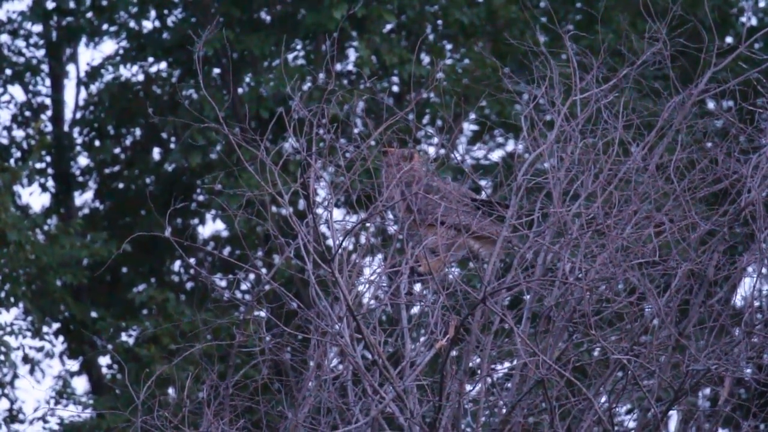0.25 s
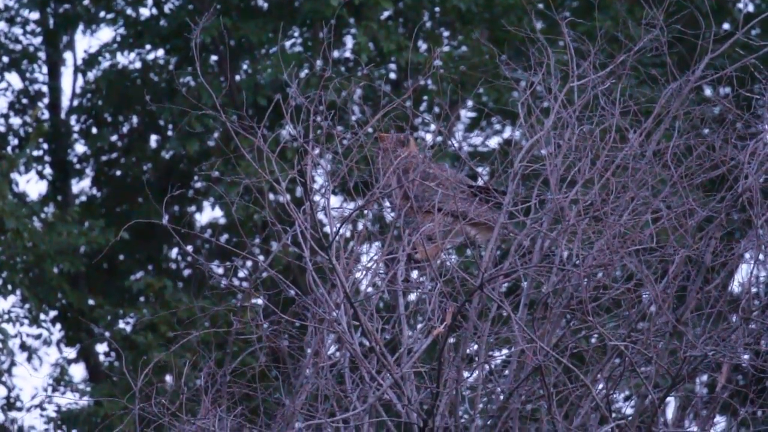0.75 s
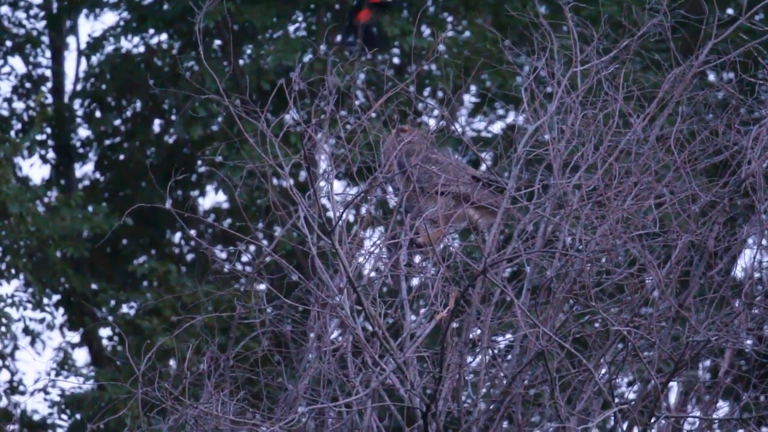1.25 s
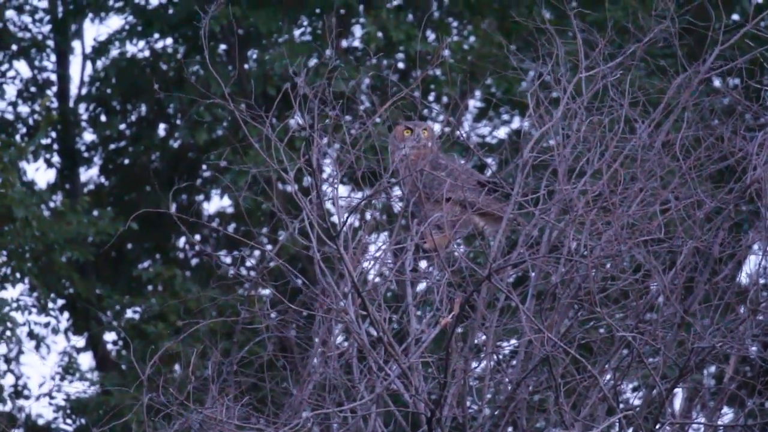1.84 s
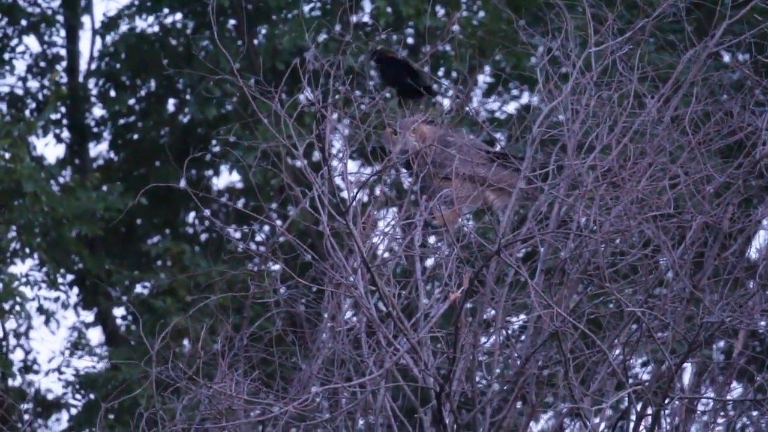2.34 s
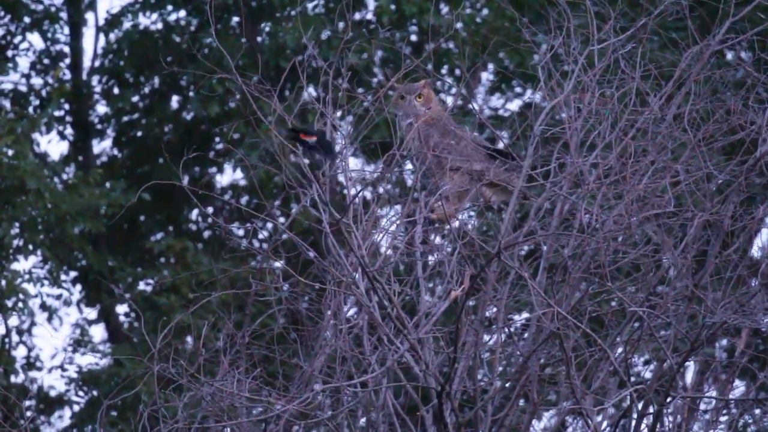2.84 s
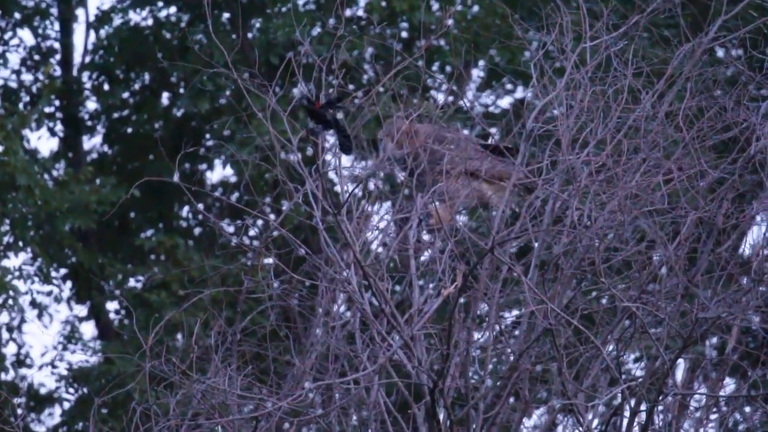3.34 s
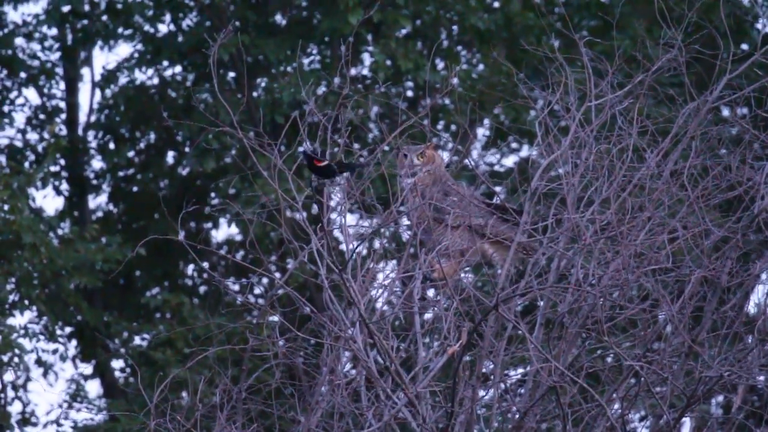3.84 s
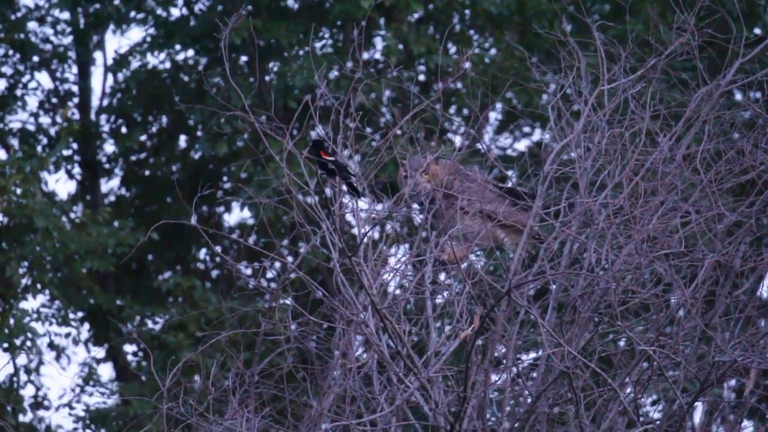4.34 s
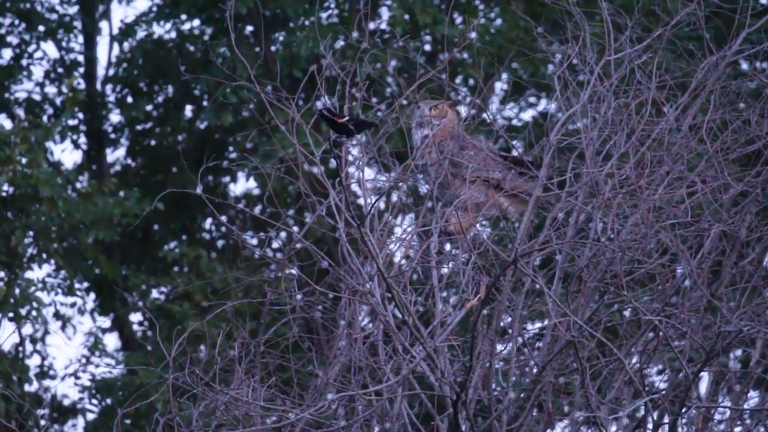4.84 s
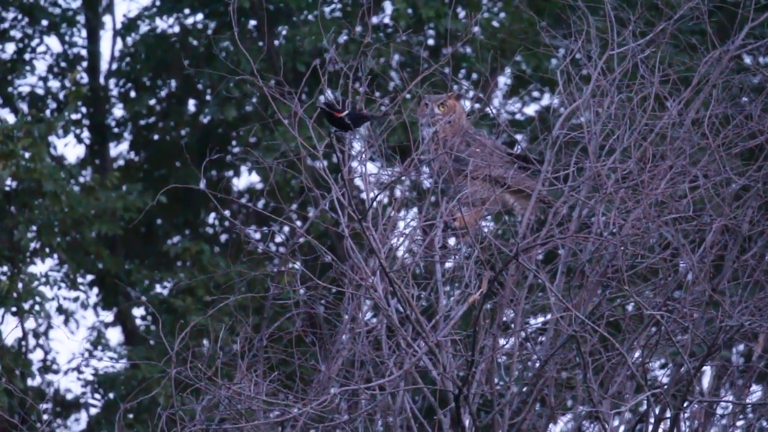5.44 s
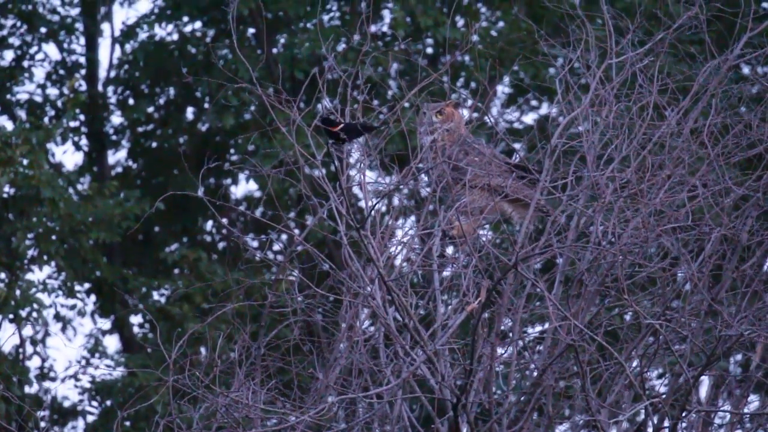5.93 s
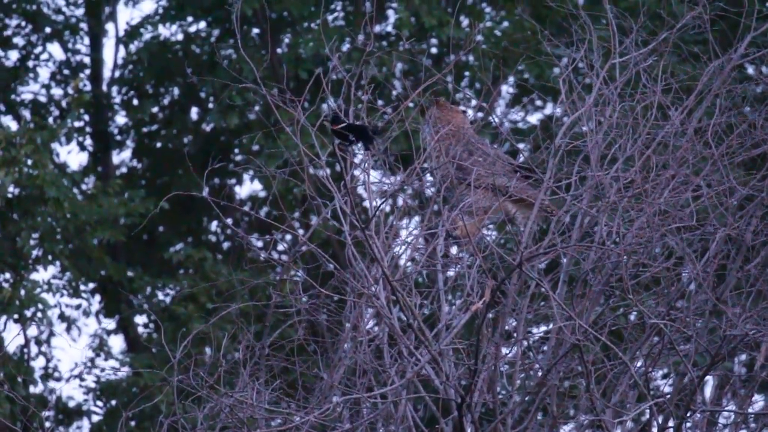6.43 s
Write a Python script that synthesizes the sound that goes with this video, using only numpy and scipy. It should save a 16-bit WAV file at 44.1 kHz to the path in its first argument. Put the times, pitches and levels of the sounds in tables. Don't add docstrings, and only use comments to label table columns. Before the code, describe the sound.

Two birds give sharp, steady yelping alarm calls in a leafy park, with scolding chucks, falling buzzy whistles and a thin cricket trill.

```python
import sys
import numpy as np
from scipy import signal
from scipy.io import wavfile
from scipy.ndimage import uniform_filter1d

SR = 44100
rng = np.random.default_rng(int(sys.argv[2]) if len(sys.argv) > 2 else 0)


def to_wav(s):
    ch = np.atleast_2d(s).T
    pcm = np.round(np.clip(ch, -1, 1) * 32767)
    wavfile.write(sys.argv[1], SR, pcm.astype(np.int16))


def linear_from_db(decibels):
    return 10 ** (np.asarray(decibels, float) / 20)


N = 294588


def evened(x):
    return x / np.sqrt(np.mean(x ** 2) + 1e-20)


def read(points, hz):
    f, value = np.transpose(points)
    return np.interp(np.log(hz + 1), np.log(f + 1), value)


def add(mix, s, sound, pan_db):
    part = mix[:, round(s * SR):][:, :len(sound)]
    part += sound[:part.shape[1]] * linear_from_db(np.array([[pan_db / 2], [-pan_db / 2]]))


def drift(count, span):
    smooth = uniform_filter1d(rng.standard_normal(count), span)
    return evened(uniform_filter1d(smooth, span))


def angle(hz):
    return 2 * np.pi * (np.cumsum(hz) / SR + rng.random())


def resonate(x, hz, width):
    turn = np.exp(2j * np.pi * hz * np.arange(len(x)) / SR)
    r = np.exp(-np.pi * width / SR)
    smooth = signal.lfilter([(1 - r) ** 2], [1, -2 * r, r * r], x / turn)
    return 2 * (turn * smooth).real


def without_bass(x, order, hz):
    return signal.sosfilt(signal.butter(order, hz, "high", fs=SR, output="sos"), x)


# f/Hz, likeness/-1 to 1
LIKENESS = [(60, 0.99), (150, 0.87), (380, 0.86), (950, 0.78), (2380, 0.35), (5980, -0.56), (15000, 0.11)]
# f/Hz, level/dB per Hz
HUM_COLOUR = [(30, -45), (50, -62.5), (80, -16.5), (115, -6.5), (165, -11), (420, -0.5), (850, 1),
              (1300, -3.5), (2060, -9), (3400, -10), (5000, -6), (5500, -15.5), (9000, -24), (15500, -33)]
# t/s, level/dB
TRAFFIC_SWELL = [(0.0, -49), (1.41, -48), (2.55, -49.5), (3.12, -48.5), (4.93, -48), (5.41, -49.5),
                 (6.34, -48.5), (6.68, -49)]


def hum():
    frames, hz = N // 512 + 5, np.fft.rfftfreq(2048, 1 / SR)
    a, b, c, d, patches = rng.standard_normal((frames, 1025, 5)).T
    patches = evened(uniform_filter1d(uniform_filter1d(patches, 20, 0), 7, 1))
    same = np.clip(read(LIKENESS, hz), -1, 1)[:, None]
    left = a + 1j * b
    right = same * left + np.sqrt(1 - same ** 2) * (c + 1j * d)
    z = np.array([left, right])
    at, swell_db = np.transpose(TRAFFIC_SWELL)
    swell_db = np.interp(np.arange(frames) * 512 / SR, at, swell_db - swell_db.mean())
    low_share = 1 / (1 + (hz[:, None] / 2500) ** 2)
    z *= linear_from_db(read(HUM_COLOUR, hz)[:, None] + 0.97 * patches + swell_db * low_share)
    lean_db = np.cos(np.pi * np.minimum(hz / 6000, 1))[:, None]
    z *= linear_from_db(np.array([.5, -.5])[:, None, None] * lean_db)
    noise = signal.istft(z, nperseg=2048, noverlap=1536)[1][:, :N]
    return linear_from_db(-46) * evened(noise)


def scatter(x, decay, shared):
    taps = np.zeros((2, SR))
    at = np.arange(60, SR - 20, 20) + rng.integers(0, 20, (2, (SR - 61) // 20))
    np.put_along_axis(taps, at, rng.choice([-1., 1.], at.shape), 1)
    taps[1] += shared * taps[0]
    hz, t, z = signal.stft(taps, SR, nperseg=256)
    fade = linear_from_db(-60 * t / read(decay, hz)[:, None])
    tail = signal.istft(z * fade, SR, nperseg=256)[1]
    tail = tail / np.linalg.norm(tail, axis=1)[:, None]
    return signal.fftconvolve(x, tail, axes=1)[:, :N]


# f/Hz, fade/s
TWIG_FADE = [(800, 0.022), (3000, 0.14), (7000, 0.22), (12000, 0.029)]
# f/Hz, fade/s
TREE_FADE = [(500, 0.82), (2500, 0.6), (4000, 0.56), (7000, 0.686), (12000, 0.69)]
# f/Hz, fade/s
TRUNK_FADE = [(1500, 0.038), (4000, 0.042), (9000, 0.068)]


def echoes(near, far, frog, insect):
    twigs = scatter(linear_from_db(-7) * near + linear_from_db(-5.5) * far + linear_from_db(-5) * frog, TWIG_FADE, 0.65)
    sent = linear_from_db(-5) * near + linear_from_db(-4.0) * far + linear_from_db(-14) * frog + linear_from_db(-9) * insect
    trees = scatter(sent, TREE_FADE, 0.75)
    delay_s = 0.03
    late = np.roll(scatter(near, TRUNK_FADE, 0.6), round(delay_s * SR), axis=1)
    trunks = linear_from_db(-14) * late * (np.arange(N) > delay_s * SR)
    return twigs + trees + trunks


def cricket():
    strokes_per_s, first_stroke = 33.876, .66
    u = (first_stroke + strokes_per_s * np.arange(N) / SR + .03 * drift(N, 2000)) % 1
    gate = np.clip((.29 - abs(u - .47)) / .05, 0, 1)
    hz = 4990 - 270 * np.clip((u - .3) / .45, 0, 1) ** 1.6 + 22 * drift(N, 700)
    level_db = -51 + 1.55 * drift(N, 1500) + 0.53 * drift(N, 200) + 1.38 * np.sin(np.pi * u)
    insect = np.zeros((2, N))
    add(insect, 0, linear_from_db(level_db) * gate * np.sin(angle(hz)), pan_db=2.2)
    return insect


def plop(s, hz, db, t60):
    t = np.arange(0, t60, 1 / SR)
    ring = linear_from_db(-60 * t / t60) * np.sin(2 * np.pi * hz * t)
    snap = linear_from_db(-9.5 - 60 * t / 0.007) * np.sin(2 * np.pi * 2.28 * hz * t)
    return s, linear_from_db(db) * (1 - np.exp(-(t / 0.001) ** 2)) * (ring + snap)


def frog_call(row, sac):
    s, mouth_hz, low_db, mouth_db, high_db = row
    (low_hz, low_t60), (high_hz, high_t60) = sac
    mouth_t60 = max(0.022 * (887 / mouth_hz) ** 2.5, .015)
    return [plop(s, low_hz, low_db, low_t60), plop(s, mouth_hz, mouth_db, mouth_t60),
            plop(s, high_hz, high_db, high_t60)]


# t/s, mouth ring f/Hz, low ring level/dB, mouth level/dB, high ring level/dB
FROG_PLOPS = [
    (0.3612, 1055, -28, -15.5, -29.5),
    (.867, 964, -28, -25, -36.5),
    (1.212, 872, -31, -11, -32.5),
    (3.0, 887, -20, -13.5, -27.5),
    (3.356, 1090, -27.5, -17.5, -25),
    (3.641, 1150, -19.5, -18, -19.5),
    (4.847, 879, -23.5, -20.5, -24.5),
    (5.10, 1052, -26.5, -20.5, -29.5),
]
SMALL_FROG_PLOPS = [
    (1.7655, 2310, -27, -33, -28),
    (1.9198, 1020, -12, -11, -15),
]
# f/Hz, fade by 60 dB/s
FROG_SAC = [(620, .021), (1780, .018)]
SMALL_FROG_SAC = [(742, .015), (1480, .013)]


def frogs():
    frog = np.zeros((2, N))
    calls = [frog_call(row, FROG_SAC) for row in FROG_PLOPS]
    calls += [frog_call(row, SMALL_FROG_SAC) for row in SMALL_FROG_PLOPS]
    for rings in calls:
        for ring in rings:
            add(frog, *ring, pan_db=3.0)
    return without_bass(frog, 2, 200)


def chip(s, length, first_hz, last_hz, db, pan_db, rough, bend=1.3):
    u = np.arange(0, 1, 1 / (length * SR))
    glide_hz = first_hz + (last_hz - first_hz) * np.sin(np.pi / 2.2 * u ** bend)
    a = angle(glide_hz * (1 + rough * drift(len(u), 30)))
    flicker_db = 46 * min(length, .12) * drift(len(u), 150)
    return s, np.sqrt(2) * linear_from_db(db + flicker_db) * np.sin(a) * signal.windows.tukey(len(u), .6), pan_db


# t/s, length/s, first f/Hz, last f/Hz, level/dB
RISING_CALLS = [(0.483, 0.017, 3030, 4280, -49.5), (.58, 0.015, 2820, 3050, -55),
                (0.595, 0.016, 2940, 5880, -43.5), (0.605, .011, 5740, 5700, -51),
                (0.701, 0.025, 3600, 6140, -46), (1.04, 0.074, 2813, 4310, -57),
                (1.15, 0.0198, 2370, 3150, -52), (1.143, .027, 3100, 4220, -52),
                (1.179, 0.0326, 4000, 4650, -51.5), (1.33, 0.0188, 2586, 3050, -61),
                (1.178, .03, 2940, 3740, -52), (1.347, 0.037, 2972, 4220, -43.5),
                (1.635, 0.016, 2810, 4920, -47), (1.936, 0.035, 4225, 4940, -50)]
QUICK_CALLS = [(0.291, 0.036, 3702, 4120, -47.5), (.345, 0.014, 4430, 6030, -55),
               (0.575, 0.029, 5570, 6500, -59), (0.816, 0.025, 4476, 5460, -48.5),
               (1.205, 0.02, 3380, 4720, -49), (1.544, 0.02, 3500, 6140, -51.5),
               (1.563, 0.013, 3680, 6250, -49), (1.621, .038, 5190, 7470, -52.5),
               (1.645, .015, 7350, 8100, -60), (.488, 0.01, 5800, 8030, -63),
               (1.025, 0.037, 6230, 5640, -65), (4.93, .018, 5470, 6660, -65),
               (4.1, .02, 5000, 7330, -53.5), (4.487, .02, 5400, 6450, -64),
               (2.066, 0.019, 2980, 4700, -45), (2.083, 0.019, 4660, 2650, -45)]
# t/s, level/dB, top f/Hz
THIN_CALLS = [
    (3.07, -53, 7800),
    (5.038, -53.5, 7380),
    (5.522, -55, 7350),
    (6.195, -56, 7870),
]
# t/s, length/s, f/Hz, level/dB
HELD_NOTES = [(0.322, 0.028, 3810, -48), (.365, 0.05, 4080, -56), (0.517, 0.02, 3800, -57.5),
              (0.525, 0.0086, 3790, -51), (.43, 0.055, 3870, -55.5), (3.789, .09, 3750, -64),
              (4.95, 0.085, 4010, -58), (0.651, 0.043, 2755, -50), (1.108, 0.046, 3833, -49.5),
              (1.47, 0.12, 3830, -60), (1.472, 0.032, 6686, -57), (1.599, 0.063, 3780, -59),
              (1.914, 0.048, 3886, -47.5), (3.30, .10, 3818, -58), (3.298, 0.054, 6570, -64),
              (3.459, 0.061, 3812, -56), (3.93, 0.036, 3830, -56), (4.512, .035, 3810, -53),
              (5.14, 0.16, 3995, -64), (5.326, 0.07, 3720, -62), (6.297, 0.056, 4010, -57.5),
              (6.13, 0.174, 4000, -66)]
# t/s, length/s, f/Hz, level/dB
LOW_SLURS = [(0.136, 0.02, 1975, -48), (3.451, 0.076, 788, -49.5), (4.235, 0.056, 2470, -52),
             (4.288, 0.0485, 2000, -54), (4.334, 0.221, 1057, -56), (5.32, .035, 1944, -55),
             (5.424, 0.029, 1700, -49), (5.643, .035, 2450, -51), (5.697, 0.046, 1815, -54.5),
             (5.757, 0.009, 2660, -56.5), (5.905, 0.067, 1895, -57.5)]


def small_birds(far):
    clear, reedy, hoarse = .008, .012, .06
    calls = [(*row, -3.5, reedy) for row in RISING_CALLS]
    calls += [(*row, .4, reedy) for row in QUICK_CALLS]
    calls += [(s, 0.013, 4670, hz, db, 6.5, clear, .6) for s, db, hz in THIN_CALLS]
    calls += [(s, length, hz, .99 * hz, db, -1.2, clear) for s, length, hz, db in HELD_NOTES]
    calls += [(s, length, hz, .91 * hz, db, -3, hoarse) for s, length, hz, db in LOW_SLURS]
    for call in calls:
        add(far, *chip(*call))


# t/s, ring f/Hz, level/dB, fade by 60 dB/s
BEAK_SNAPS = [
    (5.3032, 3200, -27, .014),
    (6.049, 3500, -29, .008),
    (4.685, 8000, -47, .005),
]


def beak_snaps(far):
    for row in BEAK_SNAPS:
        add(far, *plop(*row), pan_db=-1.5)


def chuck(s, length, db, throat_hz, pan_db, hz):
    u = np.arange(0, 1, 1 / (length * SR))
    arch = .75 + .3 * np.sin(np.pi * u ** 0.83)
    a = angle(hz * arch * (1 + 0.0447 * drift(len(u), 30)))
    pulses = evened(sum(np.cos(k * a) for k in range(2, 16)))
    drive = pulses + .5 * rng.standard_normal(len(u))
    drive = drive * linear_from_db(4 * drift(len(u), 45))
    voice = resonate(resonate(drive, throat_hz, 2900), throat_hz, 2900)
    voice = voice + linear_from_db(-18.5) * resonate(drive, 1.44 * throat_hz, 3400)
    voice = voice + linear_from_db(-33) * resonate(drive, 3.1 * throat_hz, 4100)
    return s, linear_from_db(db) * evened(voice) * 1.75 * np.sin(np.pi * u ** 0.8) ** 0.9, pan_db


# t/s, length/s, level/dB, throat f/Hz, left over right/dB
HARSH_CHUCKS = [(1.476, 0.039, -53.5, 2320, -0.9), (1.719, 0.038, -44, 3560, .3),
                (1.778, 0.04, -49, 4070, .3), (2.071, 0.042, -47.5, 3500, 0),
                (3.504, 0.036, -43.5, 3620, 0), (3.652, 0.043, -54, 3500, 2), (4.099, 0.068, -48, 3530, 1),
                (4.454, 0.0362, -47.5, 3600, .3), (4.855, 0.04, -44, 3860, .3),
                (5.123, 0.024, -50.5, 3600, 11), (5.43, 0.042, -44.5, 3780, .3),
                (4.858, .03, -68, 11600, .3), (6.05, .03, -67, 10300, .3), (5.44, 0.026, -59, 3400, .3),
                (.192, .045, -51, 3470, 0.3), (4.619, 0.034, -52, 3300, .3), (4.753, 0.026, -51, 3180, -4),
                (2.832, 0.029, -50, 3500, 2.7), (3.724, .03, -56, 2700, -4),
                (4.047, 0.031, -49.5, 2500, .3), (3.17, 0.022, -59, 2800, 2.13),
                (6.103, 0.028, -60, 3600, .3), (5.588, 0.021, -50, 3570, .3),
                (6.03, 0.032, -52, 3600, 22.5), (6.085, 0.032, -48.5, 3200, 4),
                (6.452, 0.023, -53, 2780, -8)]
DEEP_CHUCKS = [
    (0.546, 0.071, -54, 2180, -5),
    (5.628, 0.1, -58.5, 2180, -9),
]


def chucks(far):
    for row in HARSH_CHUCKS:
        add(far, *chuck(*row, hz=678))
    for row in DEEP_CHUCKS:
        add(far, *chuck(*row, hz=312))


# t/s, f/Hz, effort level/dB, buzz strength/0-1, tremolo/share
WHISTLE_SHAPE = [(0, 4753, -7, 0.9, -.1), (.035, 4010, -0.5, 0.7, -0.46), (.078, 3485, 0.5, 0.87, 0.061),
                 (.241, 3305, 0.6, 0.99, -0.083), (0.259, 3170, 0, 0.95, 0.22), (.283, 2830, -4, 1, -0.87),
                 (.305, 2570, -6, 1.0, -1.05), (.35, 2527, -2.5, 0.26, -0.43), (.435, 2580, -13, .04, 0.28)]


def whistle(s, db, buzz_depth, stretch):
    at, *columns = np.transpose(WHISTLE_SHAPE)
    at = at * stretch
    t = np.arange(0, at[-1], 1 / SR)
    hz, effort_db, strength, tremolo = (np.interp(t, at, c) for c in columns)
    buzz_hz = 328 - 110 * t - 4500 * np.maximum(t - .34, 0)
    rasp = buzz_depth ** 2
    buzz = angle(np.maximum(buzz_hz, 20) * (1 + .065 * rasp * drift(len(t), 40)))
    shake = buzz_depth * strength * (1 + .25 * drift(len(t), 300))
    a = angle(hz * (1 + .016 * rasp * strength * drift(len(t), 18)))
    bright = np.minimum(t / 0.053, 1) * np.minimum(strength, 1)
    tone = 0
    for k, part_db in enumerate([0, -28.5, -33.0, -41]):
        wobble = (1 + 0.62 * k) * shake * np.sin(buzz)
        tone = tone + linear_from_db(part_db) * bright ** k * np.sin((k + 1) * a + wobble)
    flutter = linear_from_db(db + effort_db + 0.4 * drift(len(t), 300)) * (1 + tremolo * np.cos(buzz))
    flutter = flutter * (1 + .36 * rasp * strength * drift(len(t), 22))
    return s, np.sqrt(2) * flutter * tone * signal.windows.tukey(len(t), .04)


# t/s, level/dB, buzz depth/rad, stretch/times
FALLING_WHISTLES = [
    (2.308, -35, 0.8, 1.0),
    (6.466, -39.5, 1.19, 1.15),
]


def whistles(near):
    for row in FALLING_WHISTLES:
        add(near, *whistle(*row), pan_db=0.2)


# t from its end/s, lower voice/share of held f, upper voice/share of held f
ALARM_DROP = [(.002, 1, .99), (.005, .76, .988), (.015, .61, .985), (.03, .36, .985)]


def robin(row, colour, sweep, sag, effort, gap_db, sum_db, octave_db, rasp):
    s, hold, low_hz, up_hz, db = row
    upper_db, sweep_db = colour
    at, *pitch = np.transpose(sweep + [(hold + r[0], *r[1:]) for r in ALARM_DROP])
    t = np.arange(at[0], at[-1], 1 / SR)
    curves = (*pitch, *np.transpose(effort))
    low, up, low_rel, up_rel = (uniform_filter1d(np.interp(t, at, c), size=90) for c in curves)
    held = np.clip(np.minimum(t, hold - t) / 0.012 + .5, 0, 1)
    early_db = sweep_db * np.clip(-t / .006, 0, 1)
    low_rel, up_rel = low_rel + early_db, up_rel + upper_db + early_db
    grit = 1 + .3 * (1 - held) * drift(len(t), 24)
    shake = 1 + (.002 + rasp * (1 - held)) * drift(len(t), 20)
    a = angle(low_hz * low * (1 - sag * np.clip(t / hold, 0, 1)) * shake)
    b = angle(up_hz * up * np.sqrt(shake))
    difference = held * linear_from_db(gap_db) * np.sin(b - a)
    total = (0.37 + 0.49 * held) * linear_from_db(sum_db + 2.7 * drift(len(t), 40)) * np.sin(a + b)
    overtone_level = linear_from_db(octave_db - 380 * np.maximum(t, 0) - low_rel)
    overtones = overtone_level * (np.sin(2 * a) + .5 * np.sin(3 * a))
    lower = linear_from_db(db + low_rel + 1.37 * drift(len(t), 60)) * (np.sin(a) + overtones)
    upper = linear_from_db(db + up_rel + 2.0 * drift(len(t), 60)) * (np.sin(b) + difference + total)
    return s + at[0], np.sqrt(2) * grit * (lower + upper) * signal.windows.tukey(len(t), .1)


# t/s, held length/s, lower voice f/Hz, upper voice f/Hz, level/dB
RIGHT_ALARMS = [(0.153, 0.03, 4290, 6800, -37.5), (0.714, 0.0404, 4287, 6650, -36.5),
                (1.226, 0.0372, 4236, 6700, -37.5), (1.811, 0.042, 4343, 6670, -34),
                (2.273, 0.033, 4313, 6910, -36.5), (2.785, 0.041, 4286, 6700, -35.5),
                (3.198, 0.037, 4260, 6740, -35.5), (3.617, 0.039, 4227, 6710, -37),
                (4.061, 0.035, 4287, 6820, -35.5), (4.575, 0.037, 4283, 6690, -36),
                (5.08, 0.035, 4260, 6720, -35.5), (5.55, 0.0359, 4184, 6498, -36.5),
                (6.002, 0.036, 4190, 6680, -36), (6.561, 0.0378, 4260, 6697, -38)]
LEFT_ALARMS = [(0.655, 0.038, 3930, 6720, -41.5), (1.43, 0.038, 3870, 6600, -39.5),
               (1.99, 0.036, 4010, 6680, -40.5), (2.179, 0.035, 4125, 6860, -39.5),
               (2.345, 0.033, 3920, 6700, -40), (2.709, 0.038, 4034, 6530, -42),
               (3.129, 0.033, 4020, 6960, -39.5), (3.255, 0.039, 3865, 6600, -40),
               (3.68, 0.034, 4066, 6680, -42), (4.01, 0.035, 3945, 6770, -41),
               (4.705, 0.039, 4036, 6610, -41.5), (4.805, 0.041, 3950, 6695, -37.5),
               (6.05, 0.031, 3996, 6735, -39), (6.408, 0.039, 3967, 6420, -37.5)]
# upper voice level/dB, sweep level/dB
RIGHT_CHANGES = [(1.5, -0.5), (0, 1.5), (0, 0), (0.5, -1), (0.5, -0.5), (1, 2), (0, 0), (0, 1), (0, 0.5),
                 (1, 0), (-0.5, 0), (0.5, 0), (0, -0.5), (2.5, 1.5)]
LEFT_CHANGES = [(1.5, 1), (-0.5, -7), (1.5, 1.5), (-1.5, 2), (3, -20), (-1, 3), (-2, 2), (-1, -2.5),
                (-3, 4), (1, -3), (-1, 0.5), (-1.5, -5), (0.5, 2.5), (3, -3.5)]
# t from its start/s, lower voice/share of held f, upper voice/share of held f
RIGHT_RISE = [(-.03, .36, .5), (-.015, .66, .63), (-.008, .86, .86), (.003, 1, .955), (.012, 1, 1.018)]
LEFT_RISE = [(-.03, .5, .42), (-.02, .71, .62), (-.01, .88, .89), (.001, 1, .97), (.012, 1, 1.008)]
# lower voice level/dB, upper voice level/dB
RIGHT_PUSH = [(-19, -14), (-10.5, -8), (-9, -12), (-5, -19), (-2.5, -19.5), (-1, -22), (-4.5, -38.5),
              (-10, -36), (-18.5, -53)]
LEFT_PUSH = [(-20, -36), (-2.5, -12), (-5.5, -12), (-1, -18), (-1.8, -19), (-4.5, -22), (0, -20.5),
             (0, -35), (-24, -58)]


def robins(near):
    for row, change in zip(RIGHT_ALARMS, RIGHT_CHANGES):
        call = robin(row, change, RIGHT_RISE, .075, RIGHT_PUSH,
                     gap_db=-3, sum_db=-15.5, octave_db=-29.5, rasp=0.033)
        add(near, *call, pan_db=-0.5)
    for row, change in zip(LEFT_ALARMS, LEFT_CHANGES):
        call = robin(row, change, LEFT_RISE, .028, LEFT_PUSH,
                     gap_db=2.5, sum_db=-12.0, octave_db=-30.0, rasp=0.042)
        add(near, *call, pan_db=1.0)


def scene():
    insect, frog = cricket(), frogs()
    near, far = np.zeros((2, 2, N))
    small_birds(far)
    beak_snaps(far)
    chucks(far)
    whistles(near)
    robins(near)
    near = without_bass(near, 2, 700)
    return hum() + echoes(near, far, frog, insect) + insect + frog + far + near


def top_cut(x):
    return signal.sosfilt(signal.butter(12, 15660, fs=SR, output="sos"), x)


def record(dry):
    mix = without_bass(dry, 1, 30)
    return top_cut(mix)


dry = scene()
out = record(dry)
to_wav(out)
```